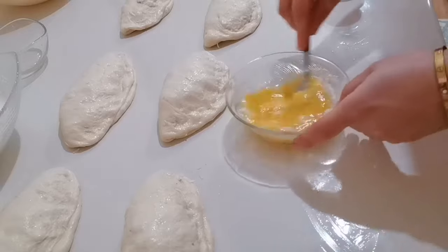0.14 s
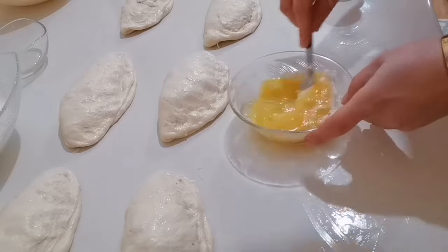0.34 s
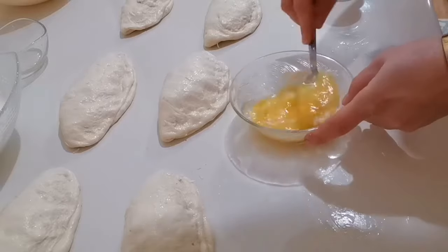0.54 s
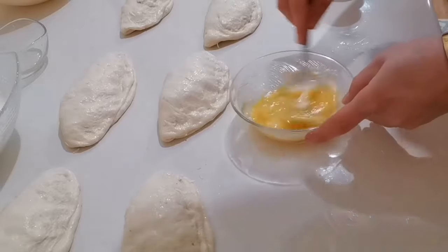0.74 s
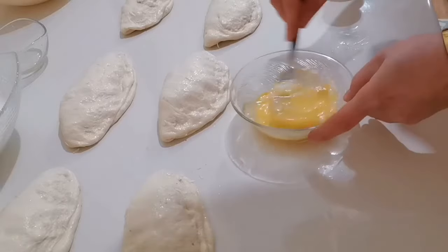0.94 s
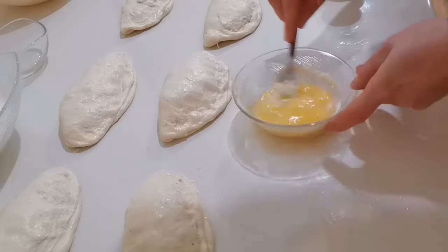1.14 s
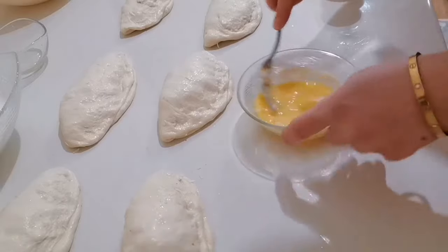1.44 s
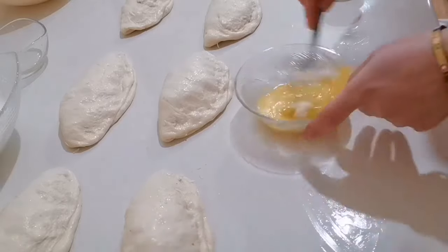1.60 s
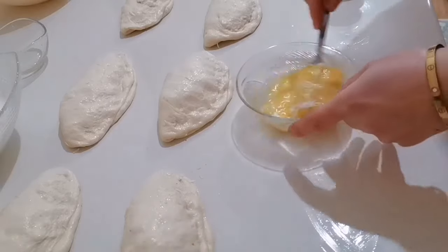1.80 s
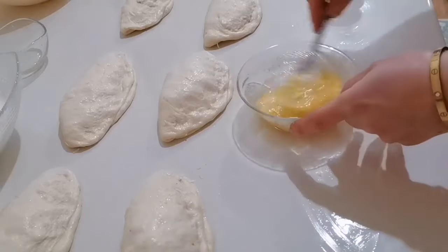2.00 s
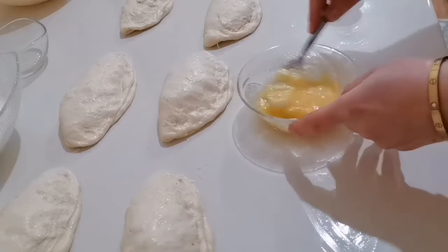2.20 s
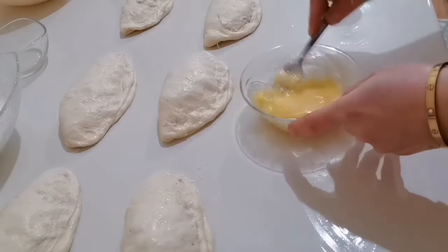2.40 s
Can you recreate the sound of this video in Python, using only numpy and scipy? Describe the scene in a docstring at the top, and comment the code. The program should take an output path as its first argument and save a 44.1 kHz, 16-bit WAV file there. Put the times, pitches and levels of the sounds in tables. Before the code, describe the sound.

Close up, fork tines clink dully on a small glass bowl of egg about six times a second, wet plops following, then a pause, another stroke and gentle ticks with bubbles, over quiet kitchen rush and rumble.

```python
"""A kitchen's quiet rush and rumble lie under everything; first the tines of a steel fork lightly touch a small bowl.
From 0.23 s full strokes through egg come about six a second; after a gap one more lands at 1.57 s, then gentler touches.
Strokes and touches excite damped glass modes, the touches add a short steel ring, and drags stick and slip.
After most strokes the lifted egg falls back with a low wet slap: soft lumps, a pocket of air and sloshing noise.
Bubbles ring and froth crackles between the strokes; a small hard-walled kitchen answers with a tail and standing waves."""
import sys
import numpy as np
from scipy import signal
from scipy.fft import rfft, irfft, next_fast_len
from scipy.io import wavfile

SR = 44100
rng = np.random.default_rng(int(sys.argv[2]) if len(sys.argv) > 2 else 0)


def pcm_store(signal):
    """Save signal as 16-bit PCM."""
    levels = np.round(np.clip(np.atleast_2d(signal), -1, 1) * 32767)
    wavfile.write(sys.argv[1], SR, levels.astype(np.int16).T)


N = 112454
T = np.arange(SR // 4) / SR  # time axis of one short event, s
BOWL_LOW_HZ = 332  # the small bowl radiates no bass
CONTACT_S = 0.00013  # time constant of the onset as steel meets glass


def amp(db):
    """Level definition: decibels to amplitude gain."""
    return 10 ** (np.asarray(db) / 20)


def along(points, hz):
    """Logarithmic frequency scale: interpolates (Hz, value) points on it."""
    f, v = np.transpose(points)
    return np.interp(np.log(hz + 1), np.log(f + 1), v)


def shaped(x, gain_db):
    """Minimum-phase filtering: folding the cepstrum makes a gain in dB over frequency causal."""
    m = 2 * next_fast_len(x.shape[-1])
    hz = np.fft.rfftfreq(m, 1 / SR)
    cepstrum = irfft(np.log(amp(gain_db(hz))), m)
    cepstrum[1:m // 2] *= 2
    cepstrum[m // 2 + 1:] = 0
    response = np.exp(rfft(cepstrum))
    return irfft(rfft(x, m) * response, m)[..., :x.shape[-1]]


def low_cut(hz, edge_hz):
    """First-order high-pass: gain in dB falling 6 dB per octave below the edge."""
    return 10 * np.log10((hz ** 2 + 1) / (hz ** 2 + edge_hz ** 2))


def tilted(x, slope_db):
    """Contact stiffness: harder contact is brighter, as a slope in dB per octave about 4 kHz."""
    return shaped(x, lambda hz: slope_db * np.log2(np.maximum(hz, 800) / 4000))


def fade(t, t60):
    """Exponential decay: falls 60 dB in t60."""
    return np.exp(-np.log(1000) * t / t60)


def ring(hz, t60, t=T):
    """Damped resonance: a sine that dies exponentially."""
    return np.sin(2 * np.pi * hz * t) * fade(t, t60)


def burst(t60):
    """Decaying noise: a puff whose energy is that of its envelope at every draw."""
    decay = fade(T, t60)
    puff = rng.standard_normal(len(T)) * decay
    return puff * np.linalg.norm(decay) / np.linalg.norm(puff)


# Likeness of a diffuse field at the two microphones. Each row: frequency in Hz, left-right likeness from 0 to 1.
FIELD_LIKENESS = [(120, 0.94), (300, 0.76), (700, 0.15), (1500, 0.035), (10000, .05)]


def diffuse(size):
    """Diffuse-field coherence: stereo noise alike in the bass, as frequencies, times and short-time spectra."""
    hz, t, (a, b) = signal.stft(rng.standard_normal((2, size)), SR, nperseg=512)
    likeness = np.clip(along(FIELD_LIKENESS, hz), 0, 1)
    angle = np.arccos(likeness)[:, None] / 2
    common, apart = np.cos(angle) * a, np.sin(angle) * b
    return hz[:, None], t, np.array([common + apart, common - apart])


def rush(spectrum):
    """Stationary noise: a steady stereo hiss of the given spectrum, scaled to rms 1."""
    field = signal.istft(diffuse(N)[2], nperseg=512)[1][:, :N]
    air = shaped(field, lambda hz: along(spectrum, hz))
    return air / air.std()


# Spectrum of the quiet rush. Each row: frequency in Hz, relative level in dB.
RUSH_SPECTRUM = [(25, -17), (60, -17.5), (110, -4), (150, -11.5), (195, 0), (260, -13), (400, -8),
                 (700, -13), (1200, -25), (3000, -31), (7000, -39.5), (16000, -57)]
# Spectrum of the low rumble. Each row: frequency in Hz, relative level in dB.
RUMBLE_SPECTRUM = [(25, 7), (45, -11), (65, -0.5), (110, -6.5), (250, -11.5), (1000, -69), (16000, -100)]
# Swell of the low rumble. Each row: time in seconds, level in dB.
RUMBLE_SWELL = [(0.0, -61), (0.43, -48), (0.5, -57.5), (1.55, -51.5), (1.58, -73), (1.78, -62.5),
                (2.21, -60.5), (2.26, -86), (2.55, -57)]


def floor(rush_db=-56.5):
    """Background noise: the steady rush of the kitchen over a rumble that swells and sinks."""
    rumble_db = np.interp(np.arange(N) / SR, *np.transpose(RUMBLE_SWELL))
    return amp(rush_db) * rush(RUSH_SPECTRUM) + amp(rumble_db) * rush(RUMBLE_SPECTRUM)


# Reverberation time of the kitchen. Each row: frequency in Hz, time to fall 60 dB in seconds.
REVERBERATION_TIME = [(100, 0.72), (300, 0.28), (800, 0.29), (2000, 0.37), (4800, 0.33), (7000, 0.26),
                      (13000, 0.18)]
# Strength of the diffuse tail. Each row: frequency in Hz, gain in dB.
TAIL_GAIN = [(60, -38), (200, 5), (800, 7), (1500, -1), (2500, -9), (5000, -10.5), (7000, -4),
             (13000, -5.5)]
# Standing waves of the room. Each row: frequency in Hz, level in dB, time to fall 60 dB in seconds.
STANDING_WAVES = [(106, -54, .8), (157, -61, .7), (196, -56, .75), (229, -59, .7), (293, -62, .6),
                  (352, -58, .65), (435, -61, .55), (560, -58, .55), (632, -58, .55), (752, -58, .5),
                  (892, -56, .5), (992, -56, .5)]


def room(build_s=0.0066):
    """Reverberation: a diffuse tail that decays at each frequency's own rate, plus standing waves."""
    hz, t, noise = diffuse(SR * 3 // 4)
    t60 = along(REVERBERATION_TIME, hz)
    even_energy = np.sqrt(2 * np.log(1000) / (SR * t60))  # offsets the energy of a longer decay
    spectra = noise * fade(t, t60) * amp(along(TAIL_GAIN, hz)) * even_energy
    tail = signal.istft(spectra, nperseg=512)[1]
    t = np.arange(tail.shape[1]) / SR
    waves = sum(amp(db) * ring(f, life, t) for f, db, life in STANDING_WAVES)
    return (tail + waves) * (1 - np.exp(-t / build_s))


def near(count=8, span_s=.009, level_db=-18.5):
    """Early reflections: weak echoes from the table and the hands, different at each microphone."""
    taps = np.zeros((2, SR // 20))
    for side in taps:
        delays = span_s * (np.arange(count) + 1 + rng.random(count)) / count
        side[(delays * SR).astype(int)] = amp(level_db) * rng.choice([-1, 1], count)
    return taps


def add(out, s, sound, wet_db, pan_db=0, lag_s=.000136):
    """Convolution with a path: direct sound, first at the right microphone, then its echoes."""
    path, early = amp(wet_db) * room(), near()
    path[:, :early.shape[1]] += early
    path[0, round(lag_s * SR)] += amp(pan_db / 2)
    path[1, 0] += amp(-pan_db / 2)
    both = signal.fftconvolve(sound[None], path, axes=1)
    rest = out[:, round(s * SR):]
    rest[:, :both.shape[1]] += both[:, :rest.shape[1]]


# Single bubbles. Each row: start in seconds, level in dB, pitch in Hz, time to fall 60 dB in cycles.
BUBBLES = [(0.7229, -29.5, 2450, 19), (.733, -22, 2520, 30), (.742, -32.5, 930, 25),
           (0.9354, -24, 2630, 18), (1.092, -20, 2930, 7.1), (1.662, -29.5, 1550, 24),
           (1.854, -33.5, 1754, 39), (1.9209, -37, 1296, 36), (1.96, -40.5, 653, 60),
           (1.9887, -34, 1670, 18), (2.002, -41, 2120, 33), (2.015, -47.5, 724, 40),
           (2.1888, -30.5, 1087, 34), (2.2216, -34, 2650, 24), (2.251, -30.5, 1540, 58),
           (2.393, -38, 2660, 39)]
# Spectrum of a small click, of tines or of a bubble's snap. Each row: frequency in Hz, gain in dB.
TICK_SPECTRUM = [(200, 28.5), (1200, -9), (2000, 11), (4500, 8), (7000, 0.5), (10500, -4.5), (14000, -8),
                 (16500, -31)]
BUBBLE_WET_DB = -2


def pops(snap_db=-8, snap_t60=0.0033, rise=0.035):
    """Bubble resonance: each bubble snaps, then rings at a rising pitch."""
    out = np.zeros((2, N))
    for s, db, hz, cycles in BUBBLES:
        snap = amp(snap_db) * shaped(burst(snap_t60), lambda f: along(TICK_SPECTRUM, f))
        life = cycles / hz
        # half the rise in mean pitch gives the whole rise in momentary pitch
        bubble = ring(hz * (1 + rise * np.minimum(T / life, 1) / 2), life)
        add(out, s, amp(db) * shaped(bubble + snap, lambda f: low_cut(f, BOWL_LOW_HZ)), BUBBLE_WET_DB)
    return out


def froth(per_s=68, middle_hz=3380, octaves=3, cycles=2.6, base_db=-54, spread_db=4):
    """Superposed bubble resonances: many tiny ones crackle in the 0.3 s after each slap."""
    out, crackle = np.zeros((2, N)), np.zeros(N + len(T))
    for u, pitch, size in rng.random((int(per_s * N / SR), 3)):
        hz = middle_hz * 2 ** (octaves * (pitch - .5))
        slap, wait = divmod(u * len(SLAP_EVENTS), 1)
        start = SLAP_EVENTS[int(slap)][0] + 0.3 * wait
        level = amp(base_db - spread_db * np.log(size + .02))
        crackle[int(start * SR):][:len(T)] += level * ring(hz, cycles / hz)
    add(out, 0, crackle[:N], BUBBLE_WET_DB)
    return out


# Egg falling back into the bowl. Each row: start in seconds, level in dB, pitch of the trapped air in Hz,
# bass lift in dB.
SLAP_EVENTS = [(.2772, -12, 910, 1), (0.4608, -24, 570, -0.5), (.618, -32, 507, -6), (.8162, -22.5, 734, 4),
               (.9878, -17, 730, -4.5), (1.1631, -12, 970, 1), (1.65, -26.5, 543, 1),
               (1.9211, -35, 666, 14), (2.2494, -31, 1540, 0.5)]
# Spectrum of the wet impact. Each row: frequency in Hz, gain in dB.
PLOP_SPECTRUM = [(50, -26.5), (100, 4.5), (250, 2), (600, 3.5), (1050, 5), (1400, -5), (2300, -10),
                 (3500, -14), (8000, -41), (16000, -62)]


def slaps(count=3, gap_s=0.0098, loss_db=1, wet_db=-3):
    """Liquid impact: egg lands in a few soft lumps, traps a resonant pocket of air and sloshes."""
    lump_db, cavity_db, cavity_cycles = 15, -5, 8
    slosh_db, slosh_t60 = -5, 0.088
    out = np.zeros((2, N))
    for s, db, cavity_hz, bass_db in SLAP_EVENTS:
        push = amp(slosh_db) * burst(slosh_t60)
        for k in range(count):
            landing_s = k * gap_s * rng.uniform(.9, 1.1)
            push[int(landing_s * SR)] -= 2 * amp(lump_db - k * loss_db)
        cavity = amp(cavity_db) * ring(cavity_hz, cavity_cycles / cavity_hz)
        plop = shaped(push, lambda hz: along(PLOP_SPECTRUM, hz)) - cavity
        slap = shaped(plop, lambda hz: bass_db / (1 + (hz / 300) ** 2) + 2 * low_cut(hz, 68))
        add(out, s, amp(db) * slap, wet_db)
    return out


# The fork dragged along the glass. Each row: start in seconds, length in seconds, level in dB.
DRAGS = [(.232, 0.036, -37.5), (0.431, 0.021, -44), (1.581, 0.097, -42.5), (1.966, 0.047, -61),
         (2.044, 0.053, -55), (2.191, 0.037, -58), (2.249, 0.038, -52)]
# Spectrum of the dragging. Each row: frequency in Hz, relative level in dB.
DRAG_SPECTRUM = [(300, -34), (1200, 1), (1700, 0), (4000, 22), (6000, -5.5), (6750, 19), (7500, 4.5),
                 (10000, -28), (11500, -5), (14500, 4.5), (16500, -12)]


def scrapes(slips_per_s=900, wet_db=-3, spread=0.37):
    """Stick-slip friction: the tines release on the glass in little grains of uneven size."""
    out = np.zeros((2, N))
    for s, length, db in DRAGS:
        slipping = rng.random(len(T)) < slips_per_s / SR
        sizes = rng.choice([-1, 1], len(T)) * np.exp(spread * rng.standard_normal(len(T)))
        grit = shaped(slipping * sizes, lambda hz: along(DRAG_SPECTRUM, hz))
        window = 1 / (1 + (T / length) ** 10)
        add(out, s, amp(db) * grit / grit.std() * window, wet_db, -1)
    return out


# Light touches of the tines. Each row: start in seconds, level in dB, brightness in dB per octave,
# tine pitch in Hz, tine ring in dB, left over right in dB.
TINE_TOUCHES = [(0.0466, -29.5, 5.5, 6700, 1.5, -1), (0.1712, -46, 2, 8800, -5, 12),
                (0.406, -55.5, 0, 9400, 4, -24), (1.2987, -38, 7.5, 6140, 3, -3.5),
                (1.6366, -30.5, -5, 6600, 3.5, -4), (1.6963, -30, -3.5, 6490, 1, 0),
                (1.8357, -37.5, 3.5, 4620, 2, -2.5), (1.8537, -29.5, 0.5, 6200, -3, -5.5),
                (1.9217, -34.5, 1, 6490, 0, -2), (2.0267, -36.5, -3, 4750, -4, -3),
                (2.0465, -29.5, 1, 3620, 1, -8.5), (2.1892, -40, 7, 8200, -17, -6),
                (2.197, -45, 5, 8100, -1, -10), (2.2281, -27, 5.5, 6060, 0, -4),
                (2.2488, -28.5, 0, 4700, 3, 12), (2.3942, -52, -3, 5000, -11, -12),
                (2.417, -30, 1.5, 9420, -2.5, -6.5)]
# Modes of the bowl above its lowest. Each row: frequency in Hz, relative level in dB,
# time to fall 60 dB in seconds.
GLASS_MODES = [(2490, -12, 0.0125), (3110, -8, 0.021), (3357, -6.5, .011), (4520, -13.5, 0.022),
               (4780, -13, 0.012), (5780, -24, 0.0073), (6740, -16.5, .04), (7105, -16.5, .022),
               (6830, -26, .11), (8950, -23, 0.032), (11200, -22.5, .015), (14200, -22, .012)]


def touches(tick_db=-0.5, tick_t60=0.0089, tine_t60=0.012, glass_db=-9, thin_hz=500, wet_db=2):
    """Light impact: grazing tines give a tick, a short steel ring and a little of the glass modes."""
    out = np.zeros((2, N))
    for s, db, bright, tine_hz, tine_db, pan in TINE_TOUCHES:
        tick = amp(tick_db) * shaped(burst(tick_t60), lambda hz: along(TICK_SPECTRUM, hz))
        glass = sum(amp(glass_db + level) * rng.standard_normal() * ring(hz, t60)
                    for hz, level, t60 in GLASS_MODES)
        steel = amp(tine_db) * ring(tine_hz, tine_t60)
        click = (tilted(tick + glass, bright) + steel) * (1 - np.exp(-T / CONTACT_S))
        add(out, s, amp(db) * shaped(click, lambda hz: 2 * low_cut(hz, thin_hz)), wet_db, pan)
    return out


# Full strokes on the bowl's wall. Each row: start in seconds, level in dB, brightness in dB per octave,
# pitch of the lowest mode in Hz, left over right in dB.
STROKES = [(.2266, -11, 0, 2160, 1), (.4299, -12, 0, 2190, 0), (.5931, -14, .5, 2170, -1),
           (.7727, -14, 0, 2220, -2), (.9522, -13.5, 0, 2180, -1), (1.1105, -12.5, 0, 2160, -2),
           (1.5733, -12, .5, 1770, -1)]
# Spectrum of the crack at contact. Each row: frequency in Hz, gain in dB.
CRACK_SPECTRUM = [(200, 18), (1200, 2.5), (2200, 8), (5500, 9), (7500, -6), (10000, -16), (12000, -16),
                  (14500, -12.5), (16500, -26.5)]


def strikes(lowest_db=-4, lowest_t60=0.014, crack_db=-4, crack_t60=.014, wet_db=1):
    """Modal impact: the fork cracks on the wall and excites glass modes that the liquid damps quickly."""
    out = np.zeros((2, N))
    for s, db, bright, lowest_hz, pan in STROKES:
        modes = [(lowest_hz, lowest_db, lowest_t60)] + GLASS_MODES
        glass = np.zeros(len(T))
        for k, (hz, level, t60) in enumerate(modes):
            sign = -(-1) ** k  # neighbouring modes start in opposite directions
            strength = amp(level + rng.normal(0, 1))
            glass += sign * strength * ring(hz * rng.normal(1, .003), t60)
        crack = amp(crack_db) * shaped(burst(crack_t60), lambda hz: along(CRACK_SPECTRUM, hz))
        contact = (glass + crack) * (1 - np.exp(-T / CONTACT_S))
        clink = shaped(contact, lambda hz: low_cut(hz, BOWL_LOW_HZ))
        add(out, s, amp(db) * tilted(clink, bright), wet_db, pan)
    return out


def scene():
    """Superposition: background, bubbles, egg, fork and glass add linearly."""
    return floor() + pops() + froth() + slaps() + scrapes() + touches() + strikes()


# Difference between the microphones. Each row: frequency in Hz, right over left in dB.
RIGHT_OVER_LEFT = [(100, -1.5), (700, -2), (2000, 1), (4500, .5), (5500, -2), (7000, 0), (11000, -2),
                   (13500, 14.5), (16000, -5)]


def record(dry, top_hz=16600):
    """Microphone response: the pair differs in tone, and a steep band limit removes the top."""
    pair = np.array([shaped(x, lambda hz: side * along(RIGHT_OVER_LEFT, hz) / 2)
                     for x, side in zip(dry, (-1, 1))])
    m = next_fast_len(N + SR // 2)
    band = 1 / (1 + (np.fft.rfftfreq(m, 1 / SR) / top_hz) ** 120)
    return irfft(rfft(pair, m) * band, m)[:, :N]


dry = scene()
out = record(dry)
pcm_store(out)
```